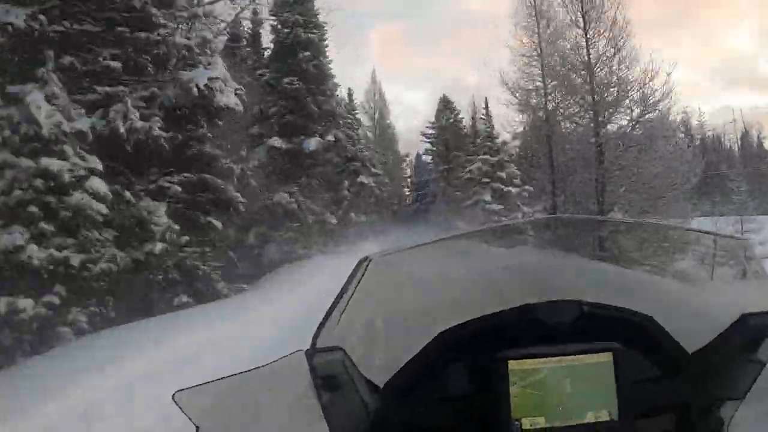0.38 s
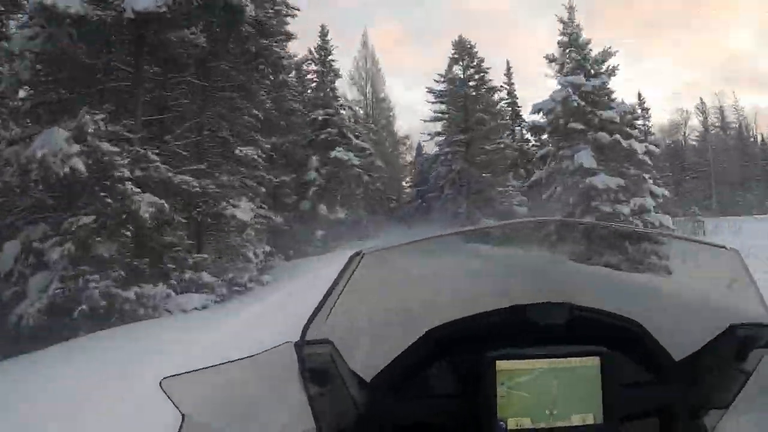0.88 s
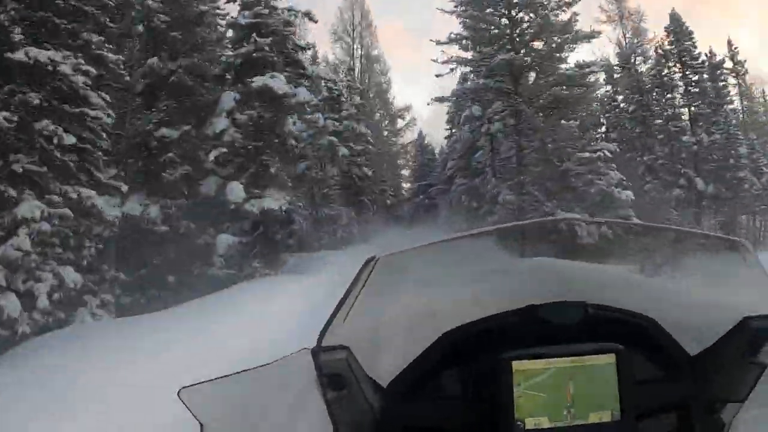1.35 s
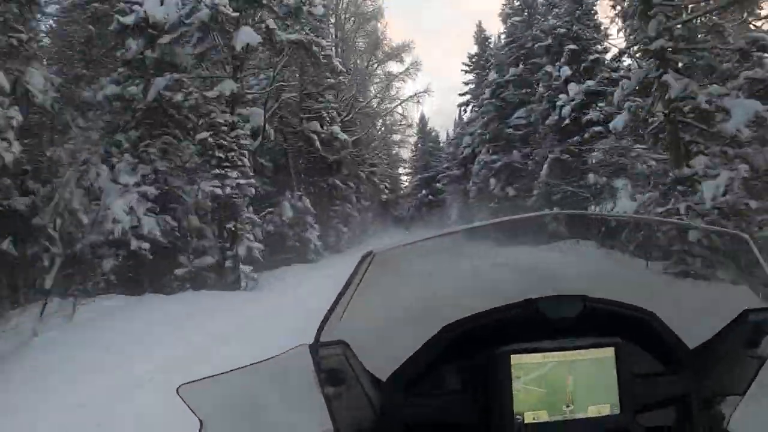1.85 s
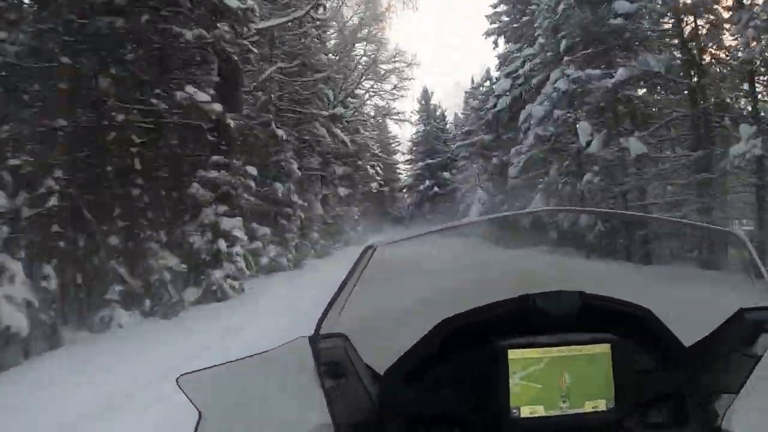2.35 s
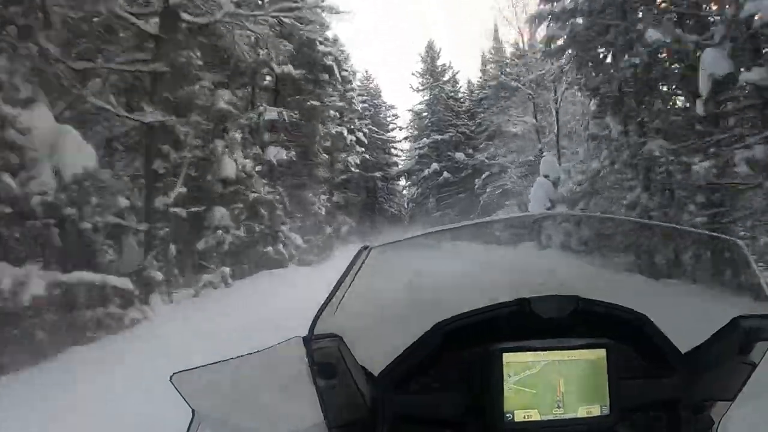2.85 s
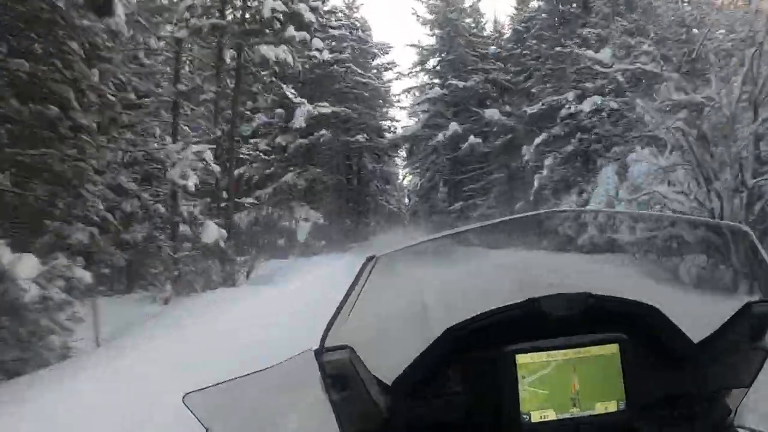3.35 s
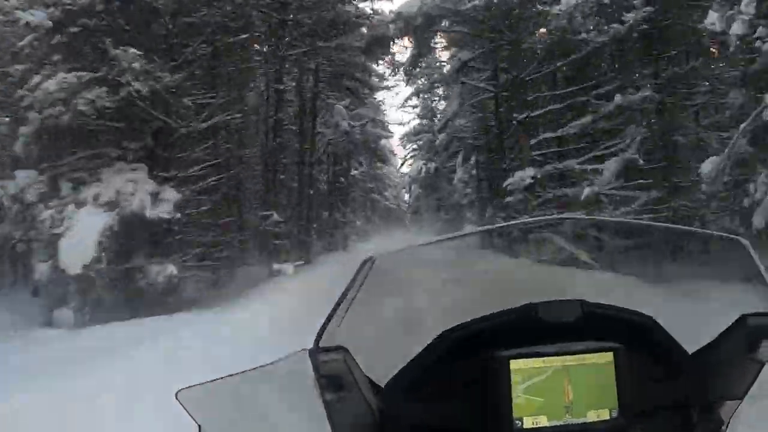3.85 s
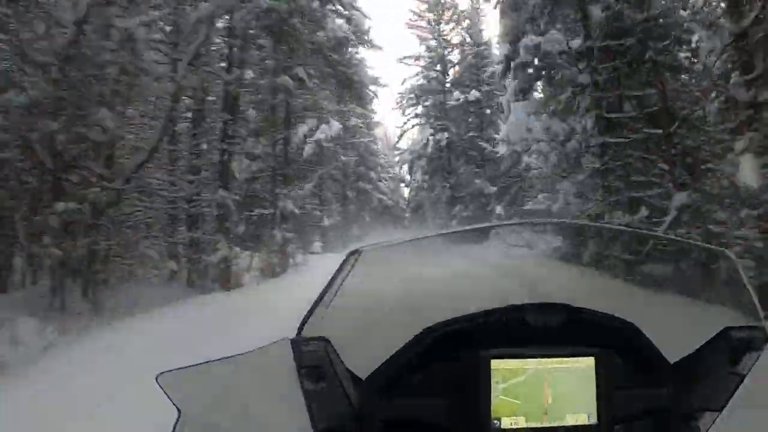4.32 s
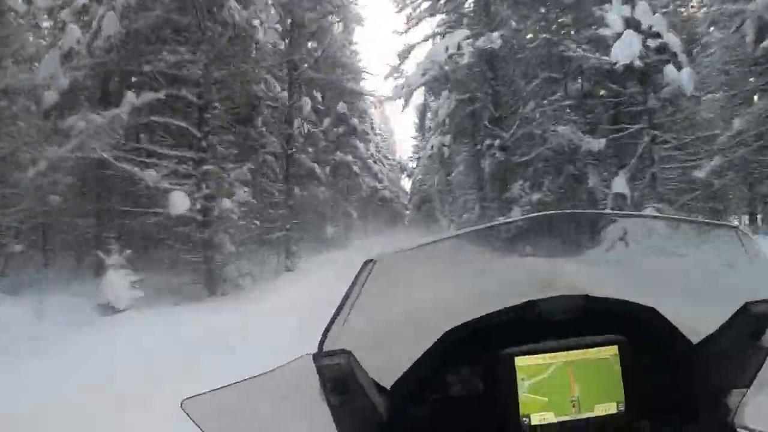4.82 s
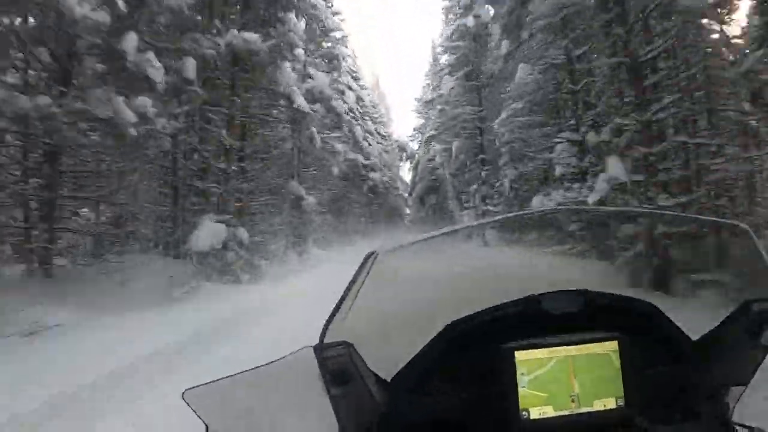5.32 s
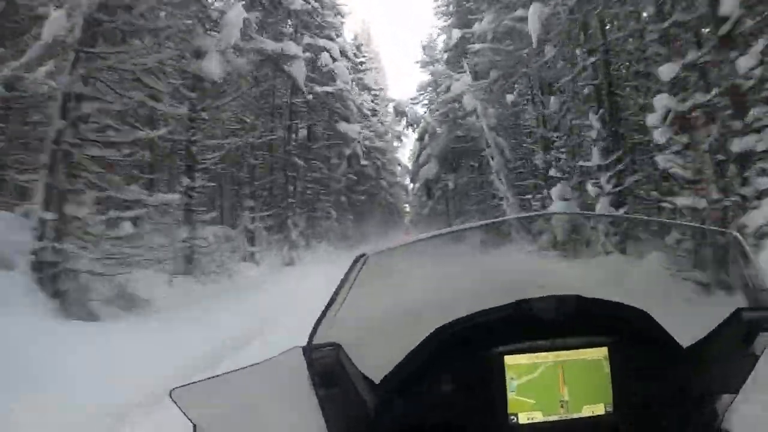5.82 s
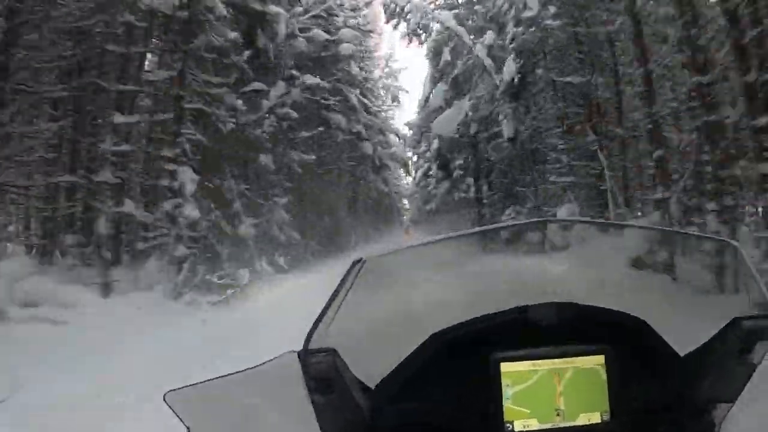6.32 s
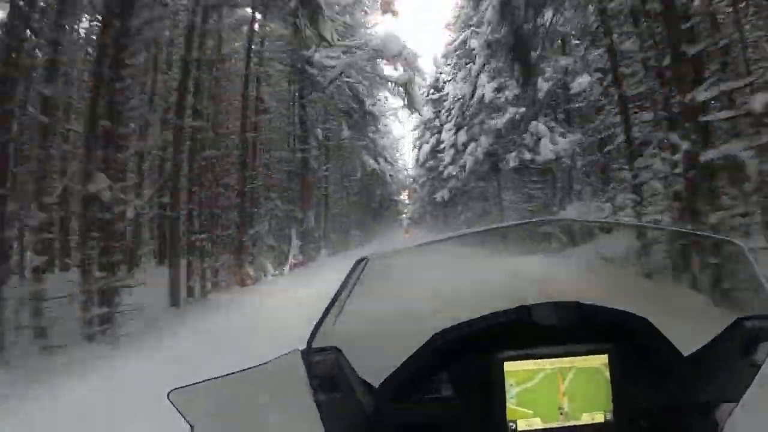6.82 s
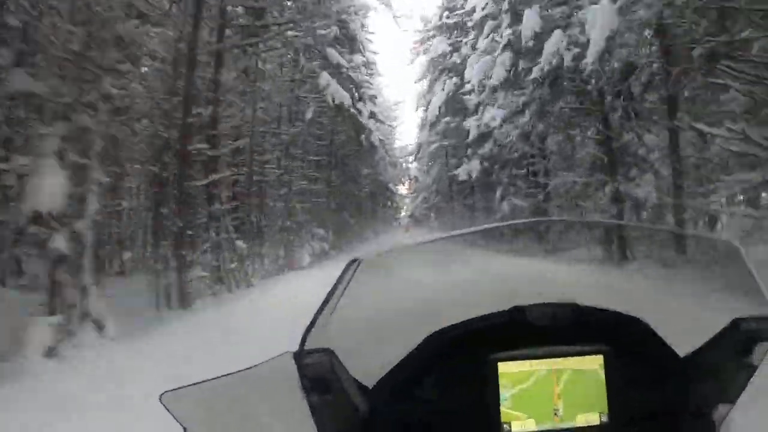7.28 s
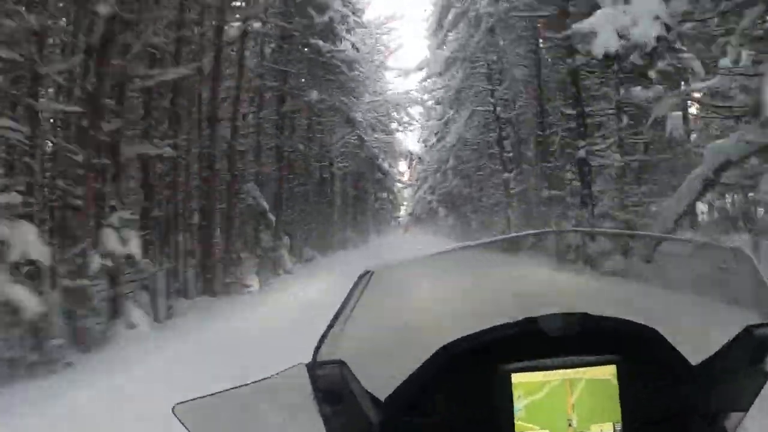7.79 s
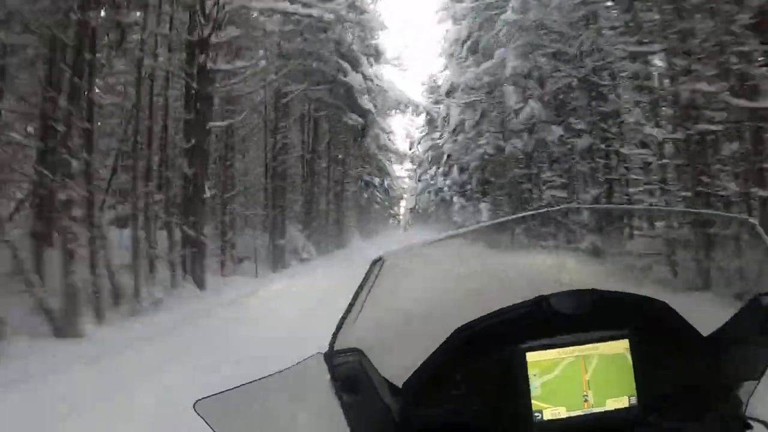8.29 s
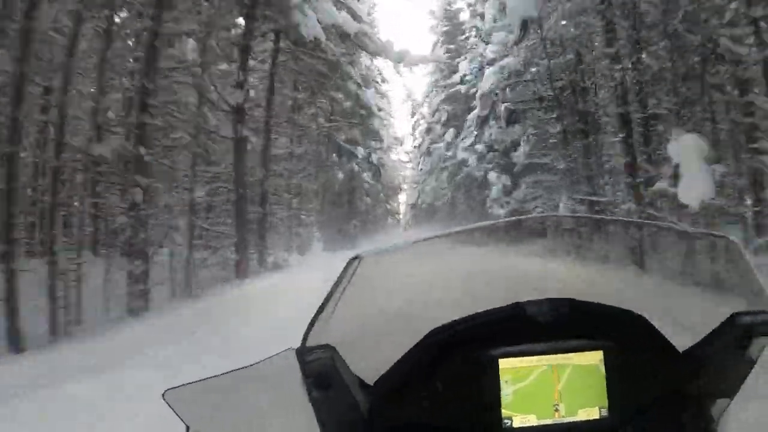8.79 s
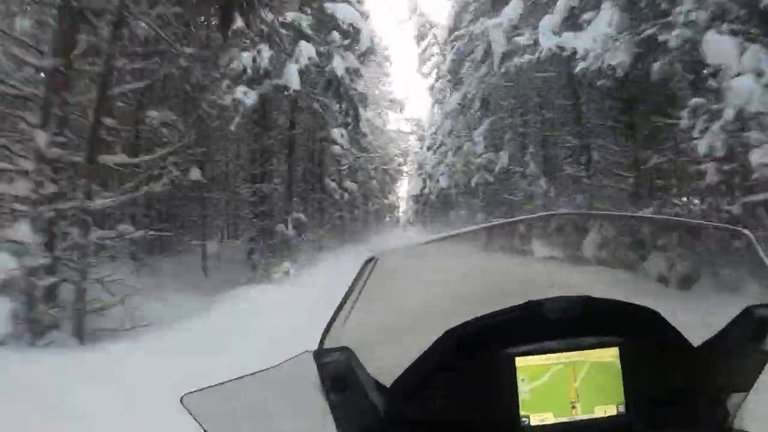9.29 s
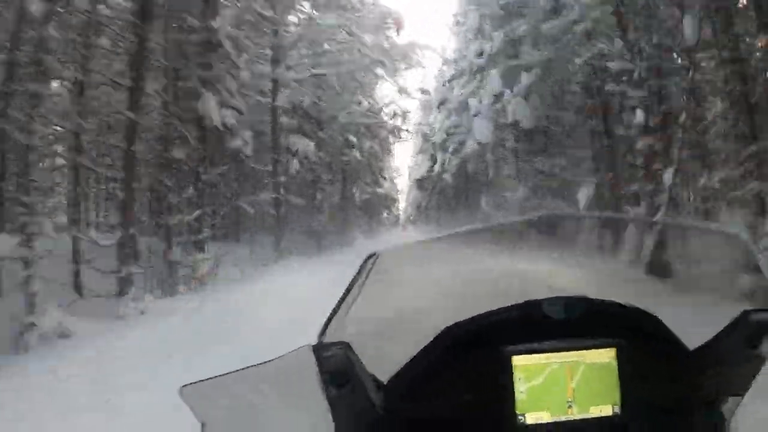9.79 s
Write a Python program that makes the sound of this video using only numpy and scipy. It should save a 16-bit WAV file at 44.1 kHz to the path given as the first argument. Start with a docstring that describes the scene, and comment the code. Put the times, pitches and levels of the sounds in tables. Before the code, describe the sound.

Close, rider's-ear drone of a snowmobile cruising, its pitch gently swelling and sagging, with warbling track hum, broadband roar, wind rumble and scattered rattles.

```python
"""A three-cylinder snowmobile engine drones through its hood along a forest trail: sines locked to the firings.
The rider wears a small two-port microphone. Track lugs hum on their sprocket and the drive chain whines (sines),
intake, drive and snow roar (flickering noise bands), wind buffets below and a faint whistle sounds at the left
(filtered noise), and loose parts tick (clicks ringing resonances)."""
import sys
import numpy as np
from scipy import signal
from scipy.fft import rfft, irfft, next_fast_len
from scipy.io import wavfile
from scipy.ndimage import uniform_filter1d

SR = 44100
rng = np.random.default_rng(int(sys.argv[2]) if len(sys.argv) > 2 else 0)


def nominal_scale(level):
    """Amplitude ratio for a level in decibels (scalar or array-like)."""
    x = np.asarray(level, float) / 20
    return 10 ** x


def store_pcm(level_fs):
    """Save levels as 16-bit WAV."""
    pcm = np.round(np.clip(level_fs, -1, 1) * 32767).astype(np.int16)
    wavfile.write(sys.argv[1], SR, np.atleast_2d(pcm).T)


N = 436590
CRUISE_HZ = 145   # reference firing rate


def rms_one(x):
    """Scale to unit rms."""
    return x / np.sqrt(np.mean(x ** 2) + 1e-20)


def in_time(rows):
    """Columns of a curve table, one value per sample."""
    s, *columns = np.transpose(rows)
    return [np.interp(np.arange(N) / SR, s, column) for column in columns]


def at_hz(points, hz, column=1):
    """A table read on a log-frequency axis."""
    points = np.array(points)
    return np.interp(np.log(hz), np.log(points[:, 0]), points[:, column])


def drift(rate_hz):
    """Slow chance: noise at every 40th sample through a double one-pole low-pass; spread 1."""
    r = np.exp(-80 * np.pi * rate_hz / SR)
    noise = rng.standard_normal(N // 40 + 2002)
    slow = signal.lfilter([1], [1, -2 * r, r * r], noise)[2000:]   # settled part
    return np.interp(np.arange(N) / 40, np.arange(len(slow)), rms_one(slow))


def coloured(x, gain_at):
    """Apply a complex gain given as a function of frequency."""
    size = next_fast_len(N)
    hz = np.maximum(np.arange(size // 2 + 1) * SR / size, 1)
    return irfft(rfft(x, size) * gain_at(hz), size)[..., :N]


def ring(clicks, hz, t60_s):
    """A unit click sets a sine of initial height 1 ringing, 60 dB down after t60_s."""
    r, w = nominal_scale(-60 / (t60_s * SR)), 2 * np.pi * hz / SR
    return signal.lfilter([0, np.sin(w)], [1, -2 * r * np.cos(w), r * r], clicks + 1e-18)


def resonance_db(hz, centre_hz, width_hz, boost_db):
    """Boost of a bell-shaped resonance, halved in dB at width_hz from its centre."""
    return boost_db / (1 + ((hz - centre_hz) / width_hz) ** 2)


def throttle():
    """1 while pressed, 0 while eased, with a short move between."""
    # Each row: start, end in seconds.
    presses = [(1.72, 2.8), (3.54, 4.69), (5.14, 5.69)]
    move_s = .07
    t = np.arange(N) / SR
    return sum(np.clip(.5 + np.minimum(t - start, end - t) / move_s, 0, 1) for start, end in presses)


def engine(hz, turn):
    """A clean firing tone; overtones swell as they cross a hood resonance and waver from firing to firing."""
    # Each row: multiple of firing rate, level before the hood in dB. Thirds come from unequal cylinders.
    order_levels = [(4 / 3, -35), (5 / 3, -46.5), (2, -21.5), (3, -32.5), (4, -39), (14 / 3, -50),
                    (5, -38.5), (17 / 3, -45), (6, -44.5), (7, -42), (8, -45), (9.9, -51)]
    # Hood resonances. Each row: centre in Hz, width in Hz, boost in dB.
    hood = [(723, 35, 8.5), (1037, 50, 11.5)]
    tone_db, tone_db_per_hz, sag_db_per_s = -10.5, 0.11, 0.1344   # louder with revs, slowly sinking
    level_db = tone_db + tone_db_per_hz * (hz - CRUISE_HZ) - sag_db_per_s * np.arange(N) / SR
    out = nominal_scale(level_db + 0.36 * drift(11)) * np.cos(turn)
    for multiple, order_db in order_levels:
        boost_db = sum(resonance_db(multiple * hz, *mode) for mode in hood)
        unrest = np.sqrt(multiple - 1)   # the higher, the less steady
        waver_db = unrest * (0.96 * drift(2.2) + .4 * drift(14))
        phase = multiple * turn - (multiple - 1) + .15 * unrest * drift(1.8)
        out += nominal_scale(order_db + boost_db + waver_db) * np.cos(phase)
    return np.sqrt(2) * out * nominal_scale([[-.15], [.15]])


def track():
    """Lugs meet the sprocket; uneven spacing repeats each lap of the belt and makes the hum warble; the chain whines."""
    # Each row: time in seconds, lug rate in Hz, hum level at the right port in dB.
    lug_curve = [(0, 267.2, -24.5), (.9, 270, -19.5), (1.8, 278.3, -19.5), (2.7, 300.2, -25.5),
                 (3.6, 305.2, -19), (4.4, 313.2, -21), (5.9, 319.7, -21.5), (7.0, 315.6, -19),
                 (8.5, 310.9, -18), (9.9, 303.5, -19)]
    # Chain case resonance: centre in Hz, width in Hz, boost in dB.
    chain_case = 3040, 50, 13
    lugs, chain_teeth_per_lug = 62, 11.27
    hz, hum_db = in_time(lug_curve)
    turn = 2 * np.pi * np.cumsum(hz) / SR
    lap = turn / lugs
    warble = 0.44 * np.sin(lap + 2.1 * drift(0.41)) + 0.17 * np.sin(2 * lap + drift(0.28)) + 0.29 * drift(14)
    gain = np.sqrt(2) * nominal_scale(hum_db + 2.0 * drift(27))
    lead = np.array([[.6], [0]])   # radians: the left port hears it weaker and earlier
    hum = nominal_scale([[-4.3], [0]]) * np.cos(turn + warble + lead)
    octave = nominal_scale([[-19], [-16]]) * np.cos(2 * (turn + .5 * warble) + lead)
    whine_db = -57 + resonance_db(chain_teeth_per_lug * hz, *chain_case) + 2.6 * drift(9.2)
    whine_phase = chain_teeth_per_lug * turn + 1.1 * drift(16) + 3 * drift(3)
    whine = nominal_scale(whine_db) * np.cos(whine_phase) * nominal_scale([[3], [-9]])
    return gain * (hum + octave) + whine


def roar(hz, pressed, whistle_db, turn):
    """Intake, drive and snow noise in flickering bands, pulsed by the firings, coloured by each port."""
    # Each row: frequency in Hz, left and right nominal level in dB per Hz.
    low_levels = [(60, -58, -62), (146, -54, -53.5), (200, -58.5, -53.5), (256, -55, -54.5),
                  (323, -58, -43), (405, -54.5, -53.5), (553, -56.5, -56.5), (670, -54.5, -50.5),
                  (710, -56.5, -57.5), (807, -48, -52.5), (807, -54, -61), (915, -52.5, -49),
                  (1085, -49, -51), (1241, -61.5, -63.5)]
    # Above those. Each row: frequency in Hz, nominal level in dB per Hz.
    treble_left = [(1250, -61), (1473, -69), (1804, -65.5), (1946, -77.5), (2153, -63), (2294, -76.5),
                   (3000, -69), (3950, -83), (4750, -84.5), (5150, -84.5), (5800, -94.5), (7500, -90.5),
                   (8100, -101), (12300, -114), (14300, -125), (15600, -124)]
    treble_right = [(1250, -65.5), (1450, -67.5), (1700, -61.5), (1950, -72), (2400, -82.5), (3250, -75.5),
                    (3520, -87), (3800, -76), (4000, -84), (4800, -73.5), (5300, -89), (6300, -91),
                    (7800, -109), (8100, -118), (12600, -118), (13500, -140)]
    # Between the ports. Each row: frequency in Hz, likeness 0-1, left lead in radians.
    ports = [(59, 0.92, 0), (198, 0.93, 0.5), (355, 0.9, 1), (726, .85, 0.93), (1020, 0.99, 0.15),
             (1360, .8, 0.06), (1750, 1, 0.66), (1970, 0.95, -1), (2320, 0.86, -4), (2380, 0.02, 2.5),
             (2900, 0, 7.5), (3680, 0.9, -5), (3980, 0.87, -6), (4200, 0.9, 1.1), (5300, 0.7, 4.5),
             (7000, 0.3, -2.5), (12000, 0, -3.5)]
    treble_db_per_hz, treble_pressed_db = -0.1455, 0.3   # sinks with revs, up a little under throttle
    treble_db = treble_db_per_hz * (hz - CRUISE_HZ) + treble_pressed_db * pressed
    source, edges_hz = 0, 50 * 2 ** np.arange(0, 9.2, 2 / 3)
    white = rng.standard_normal((2, 2, N))   # shared and own noise; neighbouring bands unrelated
    together, pulse = drift(20), 1 + 0.1 * np.cos(turn)
    for k, (low, high) in enumerate(zip(edges_hz, edges_hz[1:])):
        band_filter = signal.butter(2, [low, high], "band", fs=SR, output="sos")
        band = signal.sosfilt(band_filter, white[k % 2])
        bright = np.clip(np.log2(low / 900), 0, 1)
        level_db = bright * (treble_db - treble_db.mean())
        top = np.clip(np.log2(low / 3500), 0, 1)   # the top comes and goes with the whistle
        level_db += 0.32 * top * (whistle_db - whistle_db.mean())
        flicker_db = 0.63 * together + 1.2 * drift(22) + 0.88 * drift(4.8)
        source = source + band * nominal_scale(level_db + flicker_db) * pulse
    edge_hz = low_levels[-1][0]

    def left(f):
        return nominal_scale(np.where(f < edge_hz, at_hz(low_levels, f), at_hz(treble_left, f)))

    def right(f):
        return nominal_scale(np.where(f < edge_hz, at_hz(low_levels, f, column=2), at_hz(treble_right, f)))

    def alike(f):
        return np.clip(at_hz(ports, f), 0, 1)

    def lag(f):
        return np.exp(-1j * at_hz(ports, f, column=2))

    shared = coloured(source[0], lambda f: right(f) * alike(f) * lag(f))
    own = coloured(source[1], lambda f: right(f) * np.sqrt(1 - alike(f) ** 2))
    return np.sqrt(SR / 2) * np.array([coloured(source[0], left), shared + own])


def wind():
    """Lumpy buffeting: low noise under drifting gusts, nearly the same at both ports."""
    # Each row: frequency in Hz, relative density in dB.
    spectrum = [(10, -12), (20, -5), (37, 0), (60, -5), (100, -11), (160, -18), (300, -40), (900, -110)]
    # Each row: time in seconds, wind strength in dB.
    strength = [(0, -29), (1.4, -27.5), (2.5, -32), (4.5, -27.5), (7, -25), (9.9, -24.7)]
    wind_db, = in_time(strength)
    mid, side = rms_one(coloured(rng.standard_normal((2, N)), lambda f: nominal_scale(at_hz(spectrum, f))))
    gusts = nominal_scale(wind_db + 1.9 * drift(9.2))
    return gusts * (mid * nominal_scale([[.7], [-.7]]) + nominal_scale(-23) * side * [[1], [-1]])


def whistle(whistle_db):
    """A faint airy whistle, mostly at the left port: noise twice through a narrow resonance."""
    centre_hz, width_hz = 7690, 200
    t60_s = np.log(1000) / (np.pi * width_hz)
    once = ring(rng.standard_normal(N), centre_hz, t60_s)
    air = rms_one(ring(once, centre_hz, t60_s))
    return nominal_scale(whistle_db + 2.0 * drift(10)) * air * nominal_scale([[3], [-19]])


def ticks(pressed, small_db):
    """A loose part taps its seat: loud taps that rebound once, over many small random ones."""
    # Loud taps. Each row: time in seconds, strength in dB.
    loud_taps = [(0.558, -28.5), (1.3, -32), (1.3746, -28), (1.4253, -31.5), (1.4816, -34), (1.6626, -27),
                 (2.9442, -34), (7.535, -29), (7.5894, -31), (7.7952, -31), (7.8596, -33), (7.878, -31),
                 (7.986, -32), (8.0511, -35), (8.0696, -31), (8.099, -31), (8.5907, -30), (8.6434, -31),
                 (8.98, -32), (9.3739, -32.5), (9.7512, -24), (9.8197, -27)]
    # Each row: mode frequency in Hz, level in dB, t60 in seconds.
    modes = [(1040, 2.5, .015), (1582, -0.5, 0.05), (2150, -6, 0.029), (2920, 2, 0.011),
             (3150, -1.5, 0.009), (3690, -7, 0.016), (4170, -14.5, 0.011)]
    bounce_s, bounce_db = .013, -4   # typical rebound delay and loss
    shake_per_s, shake_pressed_db = 50, -6.5   # small taps, rarer under throttle
    near_s, near_gain = .25, .8   # and denser around the loud ones
    times, peak_db = np.transpose(loud_taps)
    chance = rng.standard_normal((len(times), 2))
    times = np.append(times, times + bounce_s * 2.0 ** (.5 * chance[:, 0]))
    peak_db = np.append(peak_db, peak_db + bounce_db + 2 * chance[:, 1])
    at, out, marks = (times * SR).astype(int), np.zeros(N), np.zeros(N)
    marks[at] = near_s * SR
    near = uniform_filter1d(marks, int(near_s * SR)) / 2
    per_s = shake_per_s * nominal_scale(shake_pressed_db * pressed) * (1 + near_gain * near)
    taps = np.flatnonzero(rng.random(N) < per_s / SR)
    small = nominal_scale(small_db + 7.0 * np.minimum(rng.exponential(1, len(taps)), 1.7))
    spread_db = rng.normal(0, 2.5, (len(at), len(modes)))
    for k, (hz, level_db, t60_s) in enumerate(modes):
        clicks = np.zeros(N)
        clicks[taps] = small * rng.standard_normal(len(taps))
        clicks[at] = nominal_scale(peak_db + spread_db[:, k])
        out += nominal_scale(level_db) * ring(clicks, hz, t60_s)
    soft = signal.butter(8, 4400, fs=SR, output="sos")   # the contact is cushioned
    return signal.sosfilt(soft, out) * nominal_scale([[2.5], [-3.5]])


def scene():
    """All sources at the two ports."""
    # Each row: time in seconds, firing rate in Hz.
    engine_speed = [(0, 138.8), (1.3, 141.1), (1.75, 143.2), (2.25, 154.3), (2.55, 156), (2.85, 154),
                    (3.15, 146.3), (3.45, 144.6), (3.9, 149.7), (4.45, 150.7), (5.05, 146.5), (5.53, 152.2),
                    (5.95, 144.8), (6.35, 142.8), (6.8, 146.2), (7.4, 141.4), (8.2, 139.6), (9.1, 140.2),
                    (9.9, 138.4)]
    flywheel_s = .15   # speed changes are rounded over this time
    hz = uniform_filter1d(in_time(engine_speed)[0], int(flywheel_s * SR), mode="nearest")
    turn = 2 * np.pi * np.cumsum(hz) / SR
    pressed = throttle()
    whistle_db = -68.5 - 12 * pressed   # the whistle drops under throttle
    machine = engine(hz, turn) + track() + roar(hz, pressed, whistle_db, turn)
    return machine + wind() + whistle(whistle_db) + ticks(pressed, small_db=-49)


def top_cut(x):
    """Nothing passes above the cut-off."""
    return signal.sosfilt(signal.butter(12, 15700, fs=SR, output="sos"), x)


def record(dry):
    """Peaks are rounded off smoothly towards a ceiling."""
    ceiling = 0.88
    rounded = dry / (1 + np.abs(dry / ceiling) ** 4) ** .25
    return top_cut(rounded)


dry = scene()
out = record(dry)
store_pcm(out)
```